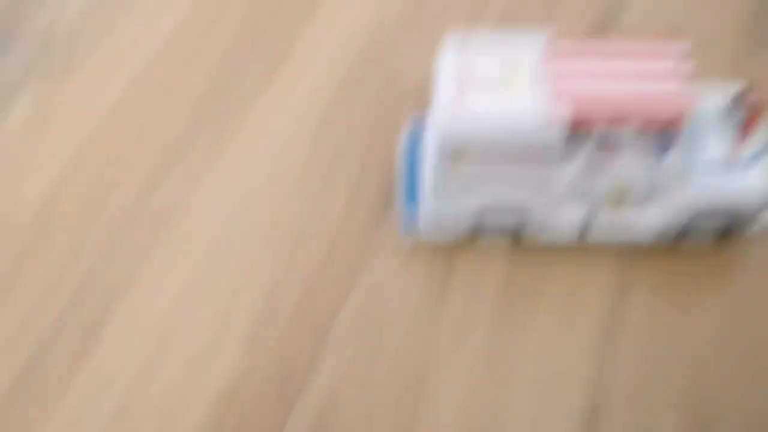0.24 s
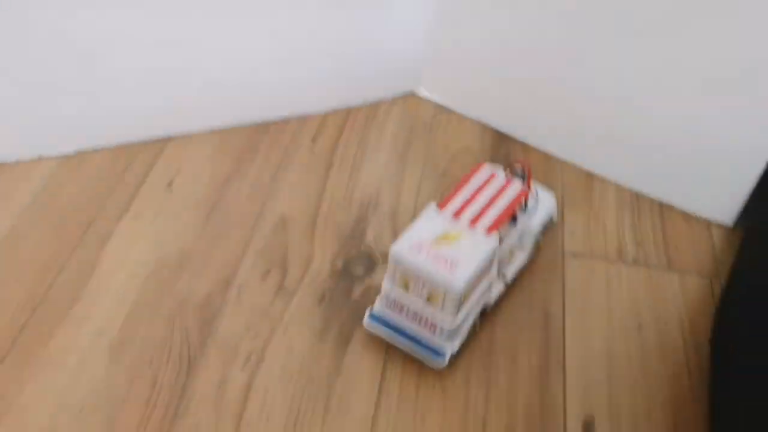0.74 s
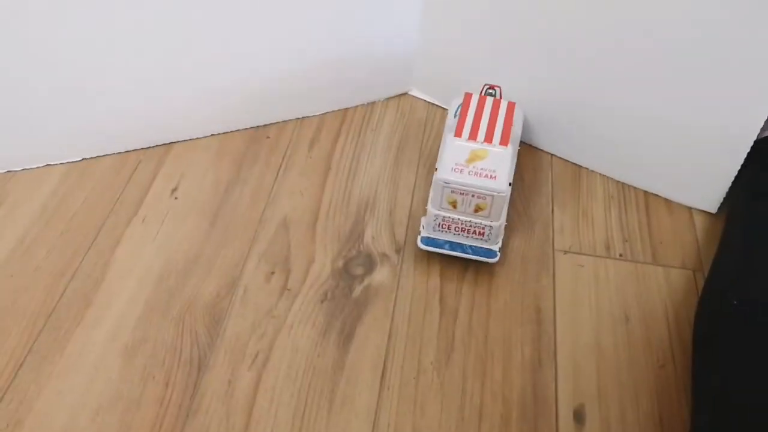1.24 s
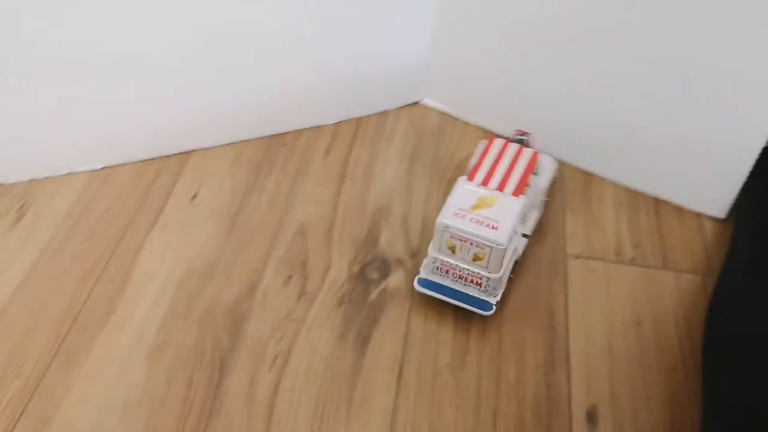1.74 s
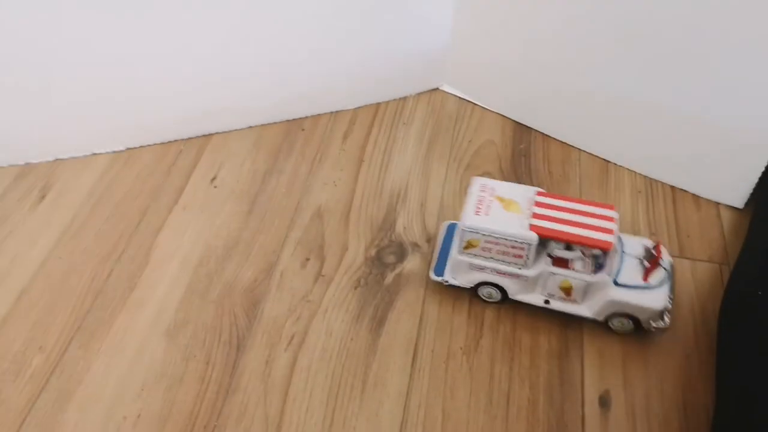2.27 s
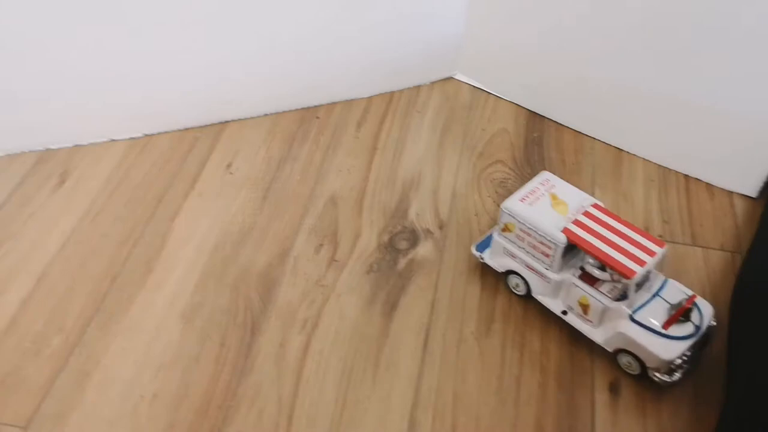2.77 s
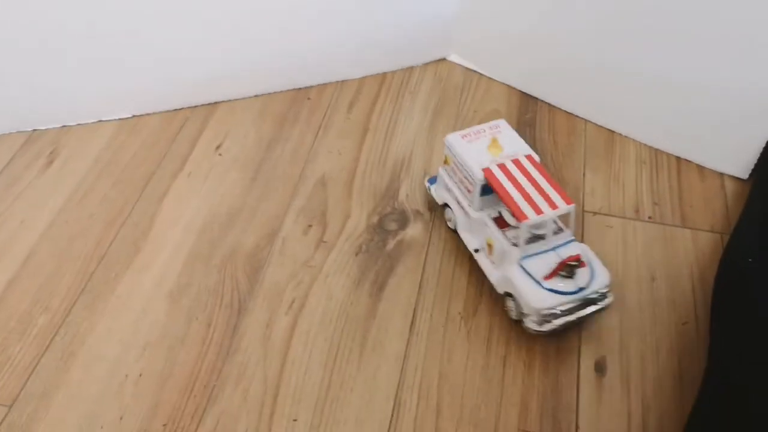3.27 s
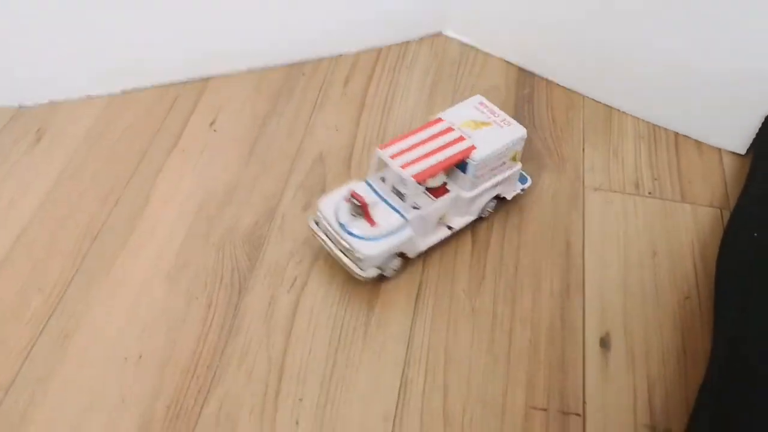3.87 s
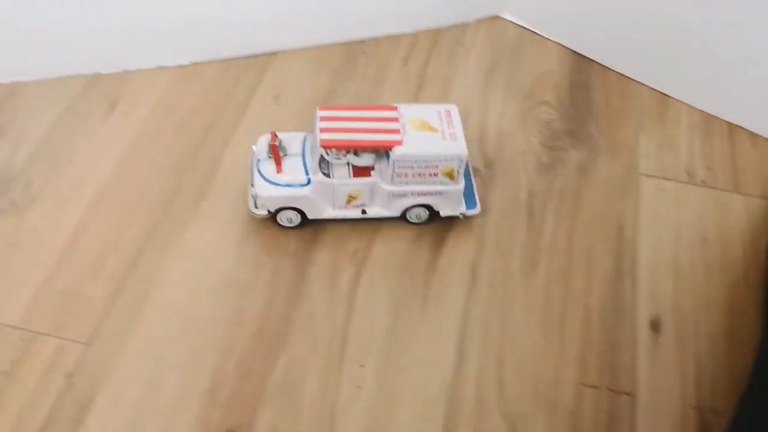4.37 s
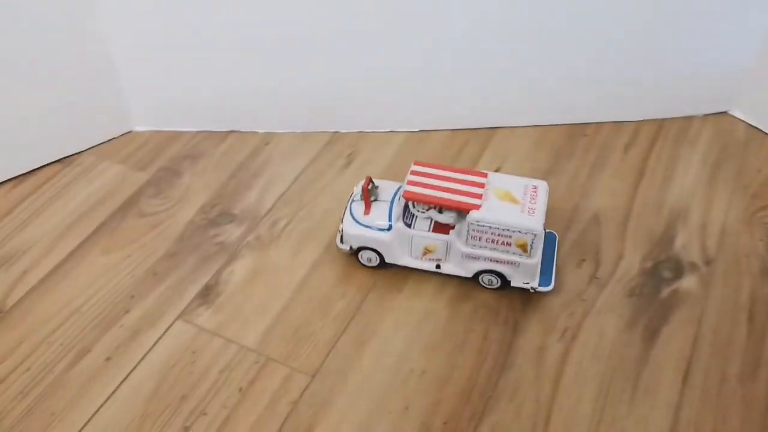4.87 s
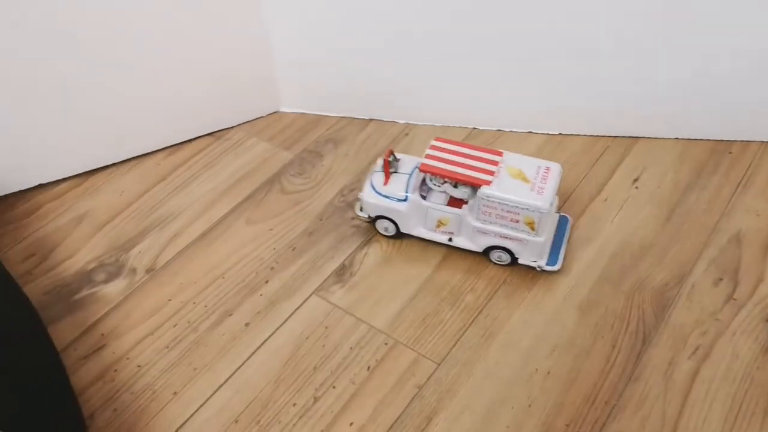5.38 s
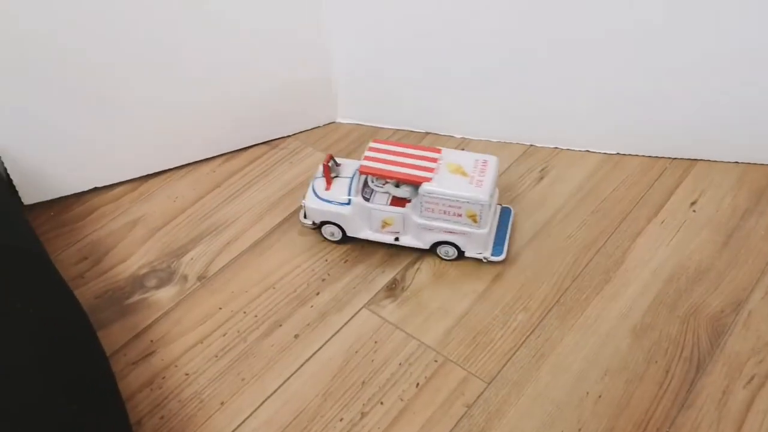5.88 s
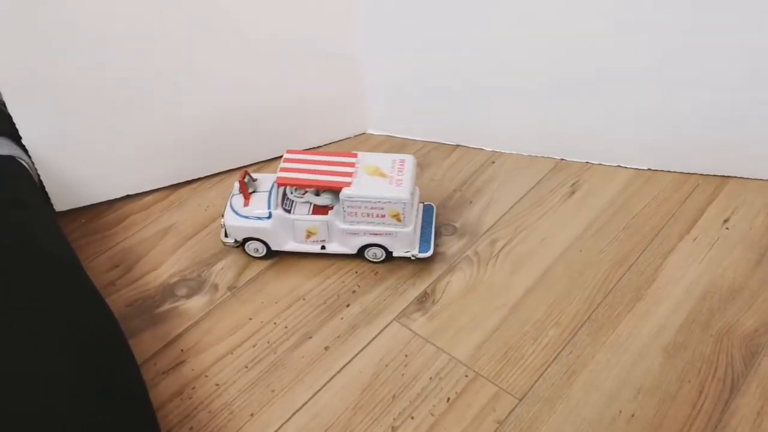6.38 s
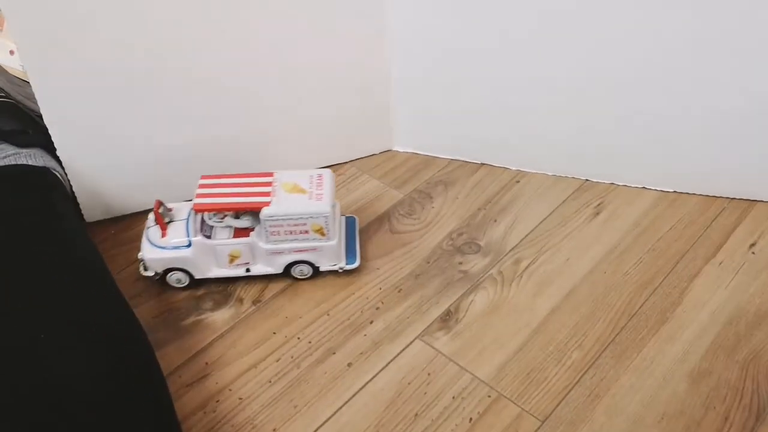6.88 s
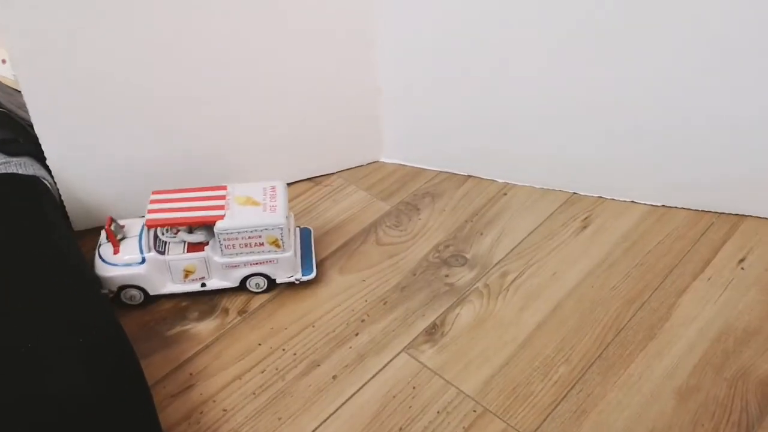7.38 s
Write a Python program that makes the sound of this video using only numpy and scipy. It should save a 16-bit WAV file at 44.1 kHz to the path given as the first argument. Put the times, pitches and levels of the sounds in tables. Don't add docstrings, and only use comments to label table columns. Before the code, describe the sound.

Harsh metallic wind-up gear buzz with uneven ticks and lurches, one loud hollow thud early on, fading slowly over faint room rumble.

```python
import sys
import numpy as np
from scipy import signal
from scipy.fft import rfft, irfft
from scipy.io import wavfile
from scipy.ndimage import map_coordinates

SR = 44100
rng = np.random.default_rng(int(sys.argv[2]) if len(sys.argv) > 2 else 0)


def makeup_ratio(level_db):
    decades = np.asarray(level_db, float) / 20
    return 10 ** decades


def wrap_up_sound(samples):
    columns = np.atleast_2d(samples).T
    tamed = np.clip(columns, -1, 1)
    steps = np.round(tamed * 32767).astype(np.int16)
    wavfile.write(sys.argv[1], SR, steps)


N = 336042
TIME = np.arange(N) / SR

# t/s, level/dB, brightness/dB
GEAR_LEVEL = [(0, -31.5, 0.5), (.12, -25, -4.5), (.4, -28.5, -2), (.9, -30, -1), (1.5, -34, 5),
              (1.85, -32.5, 0), (2.15, -35.5, -1.5), (2.7, -35, 5.5), (3.1, -34.5, 2), (3.5, -33, -2.5),
              (3.9, -36, 3), (4.4, -35.5, 4), (5, -35.5, 4.5), (5.5, -36, 4), (6, -36.5, 3.5),
              (6.6, -38, 3), (7.05, -39.5, 4.5), (7.62, -39.5, 6)]
# t/s, rate/(teeth per s)
TOOTH_RATE = [(0, 174), (2.8, 112), (4, 154), (5, 80.3), (6, 98), (7.62, 144)]
# t/s, level of the catch in all parts/dB, shell and roof level on top of that/dB
CATCHES = [(0.0338, -27, -20), (0.0634, -11.5, -35.5), (0.2007, -19.5, -6), (0.2426, -20, -10),
           (0.3217, -25, -34), (0.5726, -19, -22), (0.7832, -17, -22), (1.293, -23, -20),
           (1.4366, -17.5, -11), (1.627, -19, -9), (1.864, -18, -17), (1.9331, -22, -19), (2.3246, -30, -9),
           (2.4926, -18, -16), (2.646, -24, -19), (3.0395, -36, -20), (3.2298, -36, 13), (3.442, -26, -20),
           (3.8013, -20, -22), (4.2028, -26, -31), (4.82, -27, -9), (4.9033, -23, -18), (4.9581, -26, -12),
           (5.1382, -18.5, -25), (5.223, -25, -15), (5.375, -20, -25), (6.4106, -25, -16),
           (6.5266, -20.5, -21), (6.8396, -25, -30), (6.8734, -19, -31)]
# t/s, level/dB, length/s
LURCHES = [(0.186, 3.5, 0.01), (0.35, -2, 0.018), (2.04, 8.5, 0.02), (2.27, 8, 0.033), (2.5, 6, .07),
           (2.88, 1, 0.053), (3.25, 4, 0.034), (3.49, 1, 0.034), (3.71, -1, .03), (4.0, 8, 0.021),
           (4.23, 7.5, 0.034), (4.45, 3.5, .04), (4.69, 10, .035), (4.755, 8, 0.023), (4.94, 5.5, 0.055),
           (5.16, 7.5, 0.038), (5.39, 5, 0.06), (5.56, 4, 0.02), (5.65, 4, .03), (5.92, 4, 0.036),
           (6.16, 6, 0.03), (6.64, 3, 0.023), (6.96, 4.5, 0.071)]
# t/s, level/dB, length/s
SLIPS = [(1.04, 0.5, .02), (1.9, -10.5, 0.028), (2.2, 1.5, 0.019), (2.31, -3, 0.021), (3.4, -4, 0.086),
         (3.66, -6.5, 0.055), (4.31, -5, 0.054), (4.54, -5.5, 0.019), (4.79, -7, .02), (5.0, -3.5, 0.039),
         (5.22, -3.5, 0.024), (5.46, -5, 0.019), (6.04, -0.5, 0.025), (6.47, -3, 0.019),
         (6.99, -2.5, 0.098)]
# t/s, level/dB, length/s
NOSE_PINNED = [
    (1.45, -7, 0.37),
]
# f/Hz, width/Hz, level/dB, beam/dB, loudest heading/rad
ROOF = [(780, 360, -20.5, 4.5, 3), (824, 45, -5, 3, 1.5), (1077, 174, 0.5, -4, -8.5),
        (1206, 184, 6, 1, -1.5)]
SHELL = [(1458, 230, -9, 2.3, 0), (1654, 92, 2, 3.5, -0.32), (1910, 280, -2, 0.67, 5),
         (2480, 210, -0.5, 0.63, 1), (2690, 157, 0, 1.7, -2), (2917, 430, -9.5, 0.89, -0.5)]
SMALL_PARTS = [(3594, 570, -1, 1.2, 0.22), (4457, 63, 2, 7.8, 0.65), (4760, 1540, 1.5, 1.2, 4.3),
               (6510, 1920, 2, 0.33, 6.2), (12500, 1900, -17, 2.4, 5.4), (5085, 137, -5.5, 8.4, 1.7),
               (5756, 160, -5.5, 6.3, 1.2)]
AXLES = [(7050, 350, 1.5, 5.1, -2), (7640, 1300, -5.5, 0.67, -13.5), (8400, 230, -65, 0.9, -8),
         (11370, 1660, -14, 5, 0.5)]
SIZZLE = [(9925, 1550, 0, 1.1, 0.19), (11230, 960, -9, 6.2, 1.4)]
JOLT_SHARE = [1.24, 0.6, 0.39, 0.74, -0.88]
SLIP_SHARE = [.6, .7, .8, 1.2, 1.5]
BRIGHT_SHARE = [-0.073, -0.044, 0.33, 0.73, 1.41]
PAN_DB = [0, -3, -1.5, 0, -5.5]


def gears():
    s, shell_points, bright_points = np.transpose(GEAR_LEVEL)
    shell_db = np.interp(TIME, s, shell_points)
    bright_db = np.interp(TIME, s, bright_points)
    jolt_db, slip_db = swells(LURCHES), swells(SLIPS)

    turns = np.cumsum(np.interp(TIME, *np.transpose(TOOTH_RATE))) / SR
    count = int(turns[-1])
    chance = rng.random((count, 7)).T
    teeth = np.interp(np.arange(count) + 0.5 * chance[0], turns, TIME)

    catch_s, catch_db, dull_db = np.transpose(CATCHES)
    slack_db = swells([(s - 0.0072, -3, 0.0039) for s in catch_s])
    roof_db = -8.5 + swells(NOSE_PINNED)
    small_db = -5.5 + 11.0 * np.exp(-TIME / 0.15)

    # modes, level dB, shares of (mesh, chatter, even sliding), wobble dB, catch dB, left-right likeness
    parts = [
        (ROOF, roof_db, (0.4, 0.4, 0.6), 2.0, dull_db - 25.0, 0.9),
        (SHELL, 0, (0.45, 0.6, 0.55), 2.2, dull_db + 0.5, 0.6),
        (SMALL_PARTS, small_db, (0.5, 0.55, 0.5), 2.2, -22, 0.4),
        (AXLES, -7, (0.6, 0.5, 0.4), 2.4, -21, 0.4),
        (SIZZLE, -14, (1.1, 0.35, 0.12), 2.8, -16, 0.45),
    ]
    out = 0
    for k, (modes, part_db, (mesh_share, chatter_share, slide), wobble_db, hit_db, alike) in enumerate(parts):
        tooth_db = -13 * chance[1] ** 2 - 17.7 * chance[2 + k] ** 2
        mesh = level(scrapes(teeth, makeup_ratio(tooth_db), rise_s=0.0018, fall_s=0.0035))
        when, luck = rng.random((4000, 2)).T
        loose_db = -4.0 * np.log(luck + 0.099)
        chatter = level(scrapes(when * N / SR, makeup_ratio(loose_db), rise_s=0.0004, fall_s=0.00058))

        db = shell_db + part_db + slack_db
        db = db + JOLT_SHARE[k] * jolt_db + SLIP_SHARE[k] * slip_db + BRIGHT_SHARE[k] * bright_db
        drive = level(mesh_share * mesh + chatter_share * chatter + slide)
        drive = drive * makeup_ratio(db + wobble_db * walk(40).clip(-3, 0.7))
        drive = drive + scrapes(catch_s, makeup_ratio(catch_db + hit_db), rise_s=0.0012, fall_s=0.0032)

        size = np.sqrt(sum(makeup_ratio(2 * db) * width * np.pi / SR for hz, width, db, *beam in modes))
        pan = makeup_ratio(np.array([[PAN_DB[k]], [-PAN_DB[k]]]) / 2)
        out = out + body(two_paths(alike) * drive, modes) / size * pan
    return out


# t/s, level/dB
WHEEL_LEVEL = [(0, -37.5), (.25, -42.5), (.45, -45.5), (1, -53.5), (1.4, -56.5), (2.2, -54.5), (2.75, -65),
               (3.3, -52.5), (3.85, -56.5), (4.5, -54.5), (5.3, -53), (6.2, -55.5), (7.1, -58.5),
               (7.62, -63)]
# f/Hz, width/Hz, level/dB, beam/dB, loudest heading/rad
BOARDS = [(171, 56, -7, 1, -12.5), (253, 120, -5.5, 0.79, 1), (314, 58, 1, 2.7, -3),
          (376, 53, -4, 2.4, -4.5), (461, 57.5, -1.5, 0.36, -0.5), (730, 900, -23.5, 1.1, -16)]


def wheels():
    db = np.interp(TIME, *np.transpose(WHEEL_LEVEL)) + 0.72 * swells(LURCHES) + 0.28 * swells(SLIPS)
    when, luck = rng.random((900, 2)).T
    bump_sizes = makeup_ratio(-4 * np.log(luck + 0.026))
    patter = 0.96 + level(scrapes(when * N / SR, bump_sizes, rise_s=0.0007, fall_s=0.0097))
    boards = level(body(two_paths(1.0) * patter, BOARDS)) * makeup_ratio(db)

    hollow_hz, hollow_width = 686, 260
    air = ring(rng.standard_normal(N) * patter, hollow_hz, hollow_width)
    air = level(ring(air, hollow_hz, hollow_width), -8) * makeup_ratio(db)
    left = np.full(N, 0.5)
    right = 2 * np.exp(-TIME ** 2) - 1
    return boards, air * np.array([left, right])


# t/s, level/dB, contact and rebound/ms, direction/1
KNOCKS = [(0.183, -21, 1.24, 0.93), (0.2, -13.5, 0.57, -0.63), (0.332, -22, 11.6, 0.34),
          (0.346, -26.5, 6.4, -1.15), (1.0948, 0.5, 3.1, -0.27), (1.096, -20, 1.1, 1),
          (1.1094, -7, 2.8, 0.35), (1.137, -14, 5.4, -0.78), (1.143, -28, 0.54, 0.63),
          (1.149, -11.5, 8, -0.45), (1.185, -21, 5, 1), (1.211, -25.5, 9.3, -1.4), (1.242, -27, 5.5, 0.7),
          (1.276, -26.5, 6.7, 0.99), (1.298, -35, 7.2, -0.53), (1.608, -49, 5.2, 0.78),
          (1.919, -41, 4.1, 0.65), (4.22, -37, 2.4, 1), (4.692, -30, 2.5, 0.4), (4.924, -43, 2.9, 1),
          (5.416, -36, 2.3, 0.93)]
# f/Hz, width/Hz, level/dB
SKIRTING = [(74, 21, 3), (114, 40, -3), (169, 13, 0), (243, 46, -6.5), (302, 34, -1), (362, 11, -9.5),
            (533, 60, -20), (790, 24, -12), (1250, 210, -18), (675, 150, -16)]


def knocks():
    push, shiver = np.zeros(N), 0
    for s, db, ms, way in KNOCKS:
        n = int(ms * SR / 1000)
        swing = np.sin(2 * np.pi * np.arange(n) / n)
        push[int(s * SR):][:n] += way * makeup_ratio(db + 24.5) * swing / np.sqrt(ms)
        since = TIME - s
        shiver = shiver + makeup_ratio(db + 1.5 - 60 * since.clip(0) / 0.23) * (since > 0)
    push += shiver * rng.standard_normal(N)
    return sum(makeup_ratio(db - 13.5) * ring(push, hz, width) for hz, width, db in SKIRTING)


# t/s, level/dB, f/Hz, ring/s
SWAY = [
    (0.133, -21, 27.5, 0.26),
    (0.19, -20, 23.8, 0.26),
    (.33, -28, 40, 0.37),
]


def hand_sway():
    out = 0
    for s, db, hz, t60 in SWAY:
        since = TIME - s
        fade = makeup_ratio(-60 * since.clip(0) / t60) * (since > 0)
        out = out + makeup_ratio(db) * np.sin(2 * np.pi * hz * since) * fade
    return out


# f/Hz, wavering/Hz, level/dB
HUM = [
    (32, 8.97, -46),
    (62.8, 7.03, -45),
    (93.8, 7.84, -54),
]


def machine_hum():
    out = 0
    for hz, waver, db in HUM:
        phase = 2 * np.pi * np.cumsum(hz + waver * walk(6)) / SR
        out = out + level(np.sin(phase) * makeup_ratio(2.5 * walk(8.2)), db)
    return out


# f/Hz, level/dB
HOUSE = [(11, -10), (22, 5.5), (35, -1), (50, -11), (68, 1.5), (95, -11.5), (130, -10.5), (220, -26),
         (290, -38)]


def house():
    house_db = -41.5
    hz, db = np.transpose(HOUSE)
    bins = np.fft.rfftfreq(N, 1 / SR)
    shape = makeup_ratio(np.interp(np.log(bins + 1), np.log(hz), db))
    mid, side = irfft(rfft(rng.standard_normal((2, N))) * shape, N)
    return level(mid, house_db - 2.5) + level(side, house_db - 22) * np.array([[1], [-1]])


def level(x, db=0):
    return x * makeup_ratio(db) / np.sqrt(np.mean(x ** 2))


def ring(x, hz, width):
    return signal.lfilter(*signal.iirpeak(hz, hz / width, SR), x)


def walk(rate):
    levels = rng.standard_normal(int(N / SR * rate) + 2)
    return np.interp(TIME * rate, np.arange(len(levels)), levels)


def swells(rows):
    coarse = TIME[::32]
    bumps = sum(db * np.exp(-((coarse - s) / length) ** 2) for s, db, length in rows)
    return np.interp(TIME, coarse, bumps)


def scrapes(times, sizes, rise_s, fall_s):
    train = np.bincount((times * SR).astype(int).clip(0, N - 1), sizes, N)
    t = np.arange(SR // 20) / SR
    shape = np.exp(-t / fall_s) * (1 - np.exp(-(t / rise_s) ** 2))
    return signal.oaconvolve(train, shape / shape.max())[:N]


def two_paths(alike):
    common, left, right = rng.standard_normal((3, N))
    return np.sqrt(alike) * common + np.sqrt(1 - alike) * np.array([left, right])


# t/s, heading/rad
HEADING = [(0, 1.5), (.75, 1.5), (1.2, 3), (1.6, 2), (2, 2.3), (2.3, 0.5), (2.6, 2.1), (3, 1.2),
           (3.5, 0.24), (4, -1), (4.3, 1.65), (4.9, 3), (5.2, 4), (5.9, 4.5), (6.4, 5.5), (7.62, 5)]


def body(x, modes):
    heading = np.interp(TIME, *np.transpose(HEADING))
    out = 0
    for k, (hz, width, db, beam_db, aim) in enumerate(modes):
        gain = makeup_ratio(db + beam_db * np.cos(heading - aim) + 1.4 * walk(11))
        out = out + (-1) ** k * gain * ring(x, hz, width)
    return out


# t/s, delay/samples
PORT_LAG = [(0, 2.5), (1.5, 2.5), (4, 2.5), (5, -1.5), (7.62, -1.5)]
# f/Hz, width/Hz
HAND = [
    (630, 168),
    (2600, 790),
]


def heard(x, wet_db):
    lag = np.interp(TIME, *np.transpose(PORT_LAG)) + 1.62 * walk(2.0)
    late = map_coordinates(x[0], [np.arange(N) - lag], order=3, mode="mirror")
    for hz, width in HAND:
        late = late - 2 * ring(late, hz, width)

    room_t60_s = 0.14
    t = np.arange(SR // 3) / SR
    wet, hop = np.zeros((2, N + SR)), SR // 4
    for start in range(0, N - hop, hop):
        echoes = rng.standard_normal((2, len(t))) * makeup_ratio(-60 * t / room_t60_s) * (t > 0.0012)
        echoes = signal.lfilter([1], [1, -0.45], echoes)
        echoes = echoes / np.sqrt(np.sum(echoes ** 2) / 2)
        piece = x[:, start:start + 2 * hop] * np.sqrt(np.hanning(2 * hop))[:N - start]
        tail = signal.fftconvolve(piece, echoes, axes=1)
        wet[:, start:start + tail.shape[1]] += tail
    direct = np.array([late, x[1]])
    return (direct + makeup_ratio(wet_db) * wet[:, :N]) / np.sqrt(1 + makeup_ratio(2 * wet_db))


def scene():
    thud = knocks()
    boards, air = wheels()
    toy = heard(gears() + boards + makeup_ratio(-12) * thud, wet_db=-10)
    return toy + air + thud + hand_sway() + machine_hum() + house()


def low_pass(x):
    return signal.sosfilt(signal.butter(12, 15780, fs=SR, output="sos"), x)


# f/Hz, width/Hz, level/dB
PORT = [
    (9800, 420, 11),
    (9840, 310, 20.5),
]


def record(dry):
    ports = []
    for x, (hz, width, boost_db) in zip(dry, PORT):
        cavity = ring(ring(x, hz, 39.3 * width), hz, width)
        ports.append(x + makeup_ratio(boost_db) * cavity)
    ports = np.array(ports)
    ports[0] -= 0.7 * ring(ports[0], 11940, 4400)
    ports = np.tanh(1.828 * ports) / 1.402
    top_cut = signal.ellip(8, 0.2, 60, 15150, fs=SR, output="sos")
    mix = signal.sosfilt(top_cut, ports)
    return low_pass(mix)


dry = scene()
out = record(dry)
wrap_up_sound(out)
```